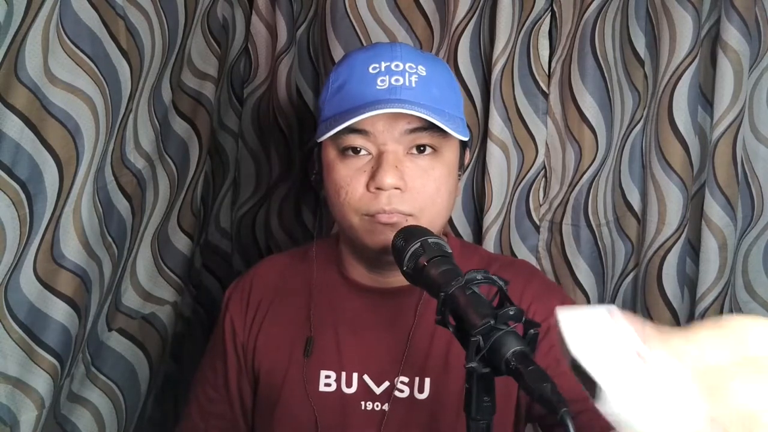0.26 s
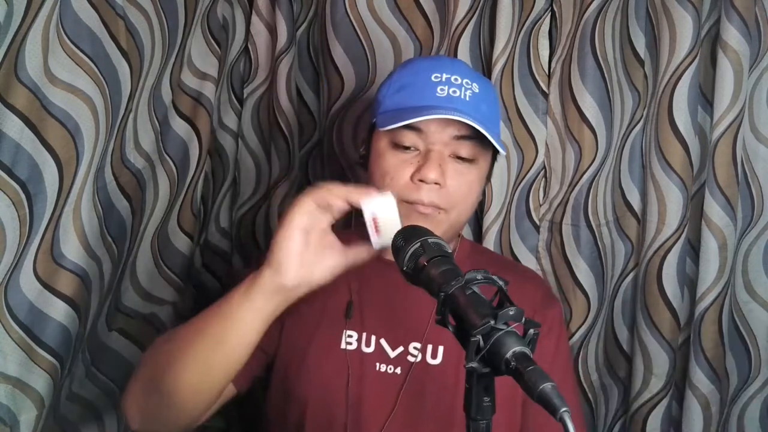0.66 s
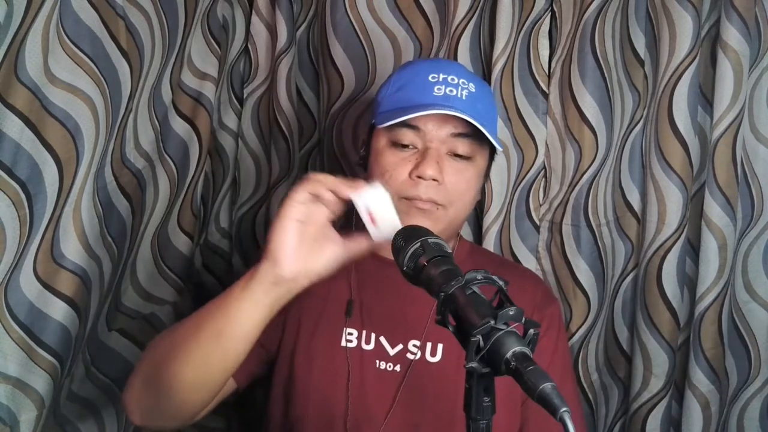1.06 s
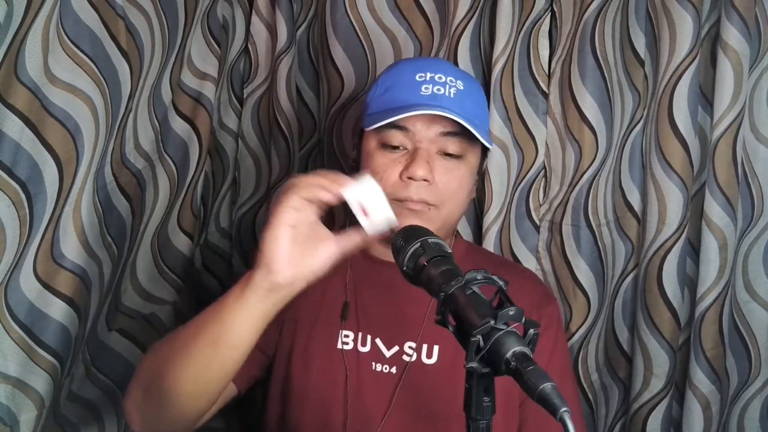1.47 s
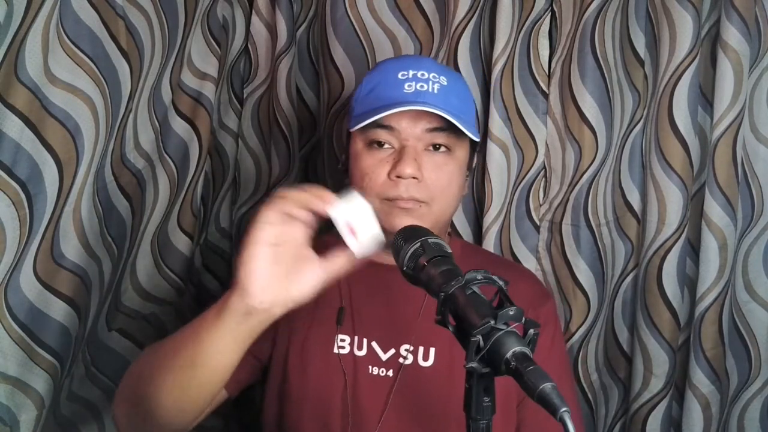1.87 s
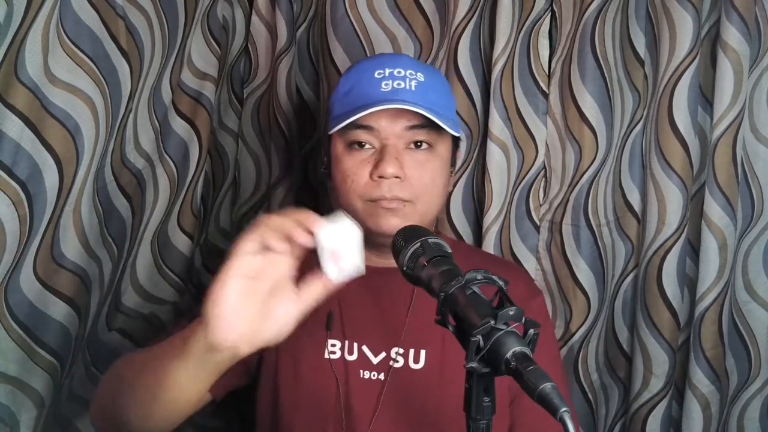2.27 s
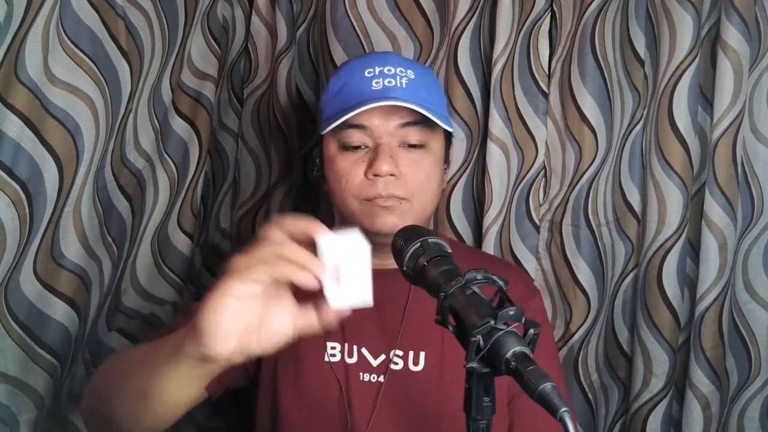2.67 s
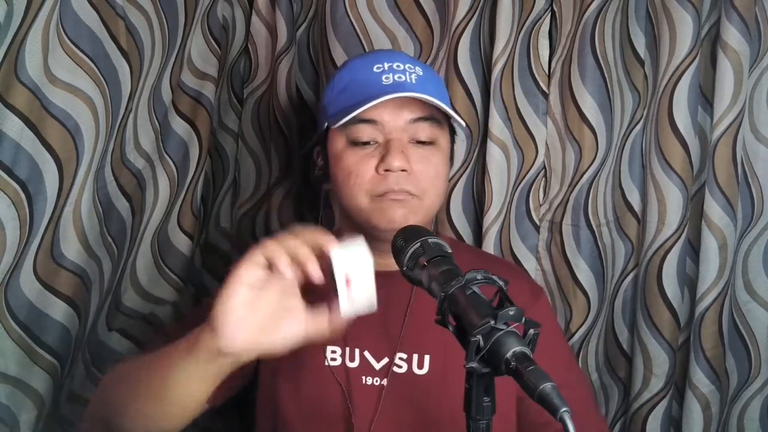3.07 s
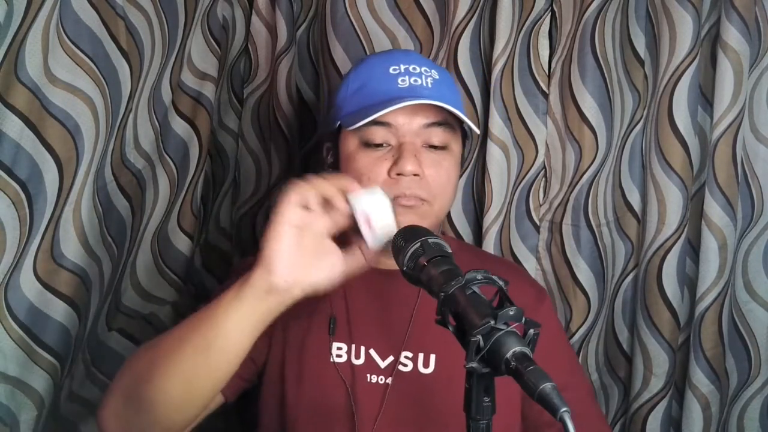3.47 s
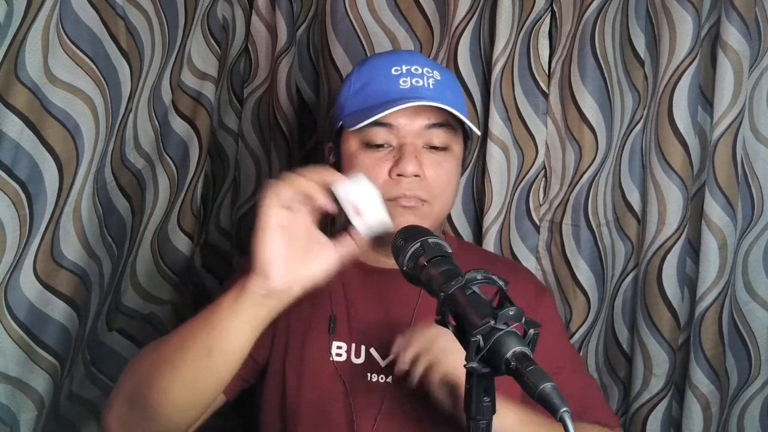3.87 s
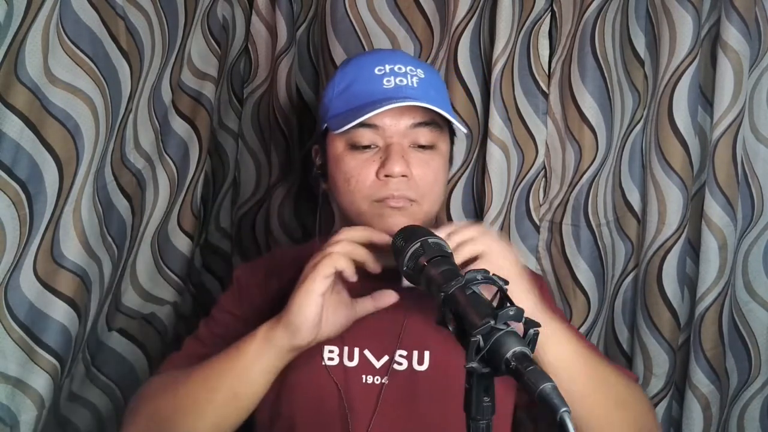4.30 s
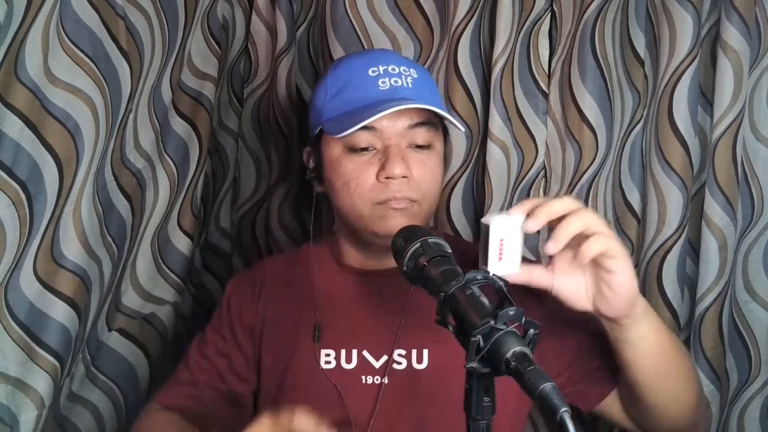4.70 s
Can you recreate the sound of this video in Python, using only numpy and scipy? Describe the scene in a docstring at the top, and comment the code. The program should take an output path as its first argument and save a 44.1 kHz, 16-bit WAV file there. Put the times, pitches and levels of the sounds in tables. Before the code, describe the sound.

Close to a microphone in a small curtained indoor space, wooden matchsticks slide and land inside a thin cardboard box, about five strong clatters a second with lighter ones between. They become fainter and more distant past the middle, come back crisp and close, then give way to sparse soft handling rattles. Quiet hiss runs underneath, with a brief opening rumble and barely audible hum.

```python
"""A low rumble opens the scene and soon stops; a steady thin hiss runs throughout and a faint hum swells now and then.
After a few small clatters of matches in their box, a hand shakes it about five times a second in a curtained room.
On each stroke they slide along the tray and land in a clatter of tiny clicks; the cardboard rings briefly and thuds.
The small room is heard more or less strongly as the box moves, and a few more small clatters end the scene.
The wood and box sounds are random clicks passed through short ringing tones; the rumble and hiss are shaped noise."""
import sys
import numpy as np
from scipy import signal
from scipy.fft import rfft, irfft
from scipy.io import wavfile
from scipy.ndimage import uniform_filter1d

SR = 44100
rng = np.random.default_rng(int(sys.argv[2]) if len(sys.argv) > 2 else 0)


def wav_record(signal):
    """Record a signal, one row per channel, as 16-bit PCM in the file named by sys.argv[1]."""
    frames = np.transpose(np.atleast_2d(signal))
    bounded = np.clip(frames, -1, 1)
    # unit amplitude maps onto the largest positive 16-bit level
    quanta = np.round(bounded * 32767).astype(np.int16)
    wavfile.write(sys.argv[1], SR, quanta)


N = 213530
TIME = np.arange(N) / SR
ONE_MS = np.sqrt(SR / 1000)  # gives a sound of energy one the energy of 1 ms at full level
TYPICAL_DB = -26.5  # energy of a typical landing, as dB over 1 ms


def undb(db):
    """Decibels to gain."""
    return 10 ** (np.asarray(db) / 20)


def curve(rows, t=TIME, axis=1):
    """One column of a table, joined by straight lines in time."""
    rows = np.array(rows)
    return np.interp(t, rows[:, 0], rows[:, axis])


def unit(x):
    """The same sound with an energy of one."""
    return x / np.sqrt(np.sum(x ** 2) + 1e-20)


def chance(size=None):
    """Bell-shaped random numbers without extremes."""
    return np.clip(rng.standard_normal(size), -2, 2)


def response(points, size=2048):
    """Short click of unit energy with the given (frequency [Hz], level [dB]) spectrum, strongest early on."""
    hz, db = np.transpose(points)
    bins = np.maximum(np.fft.rfftfreq(size, 1 / SR), 1)
    log_gain = np.log(undb(np.interp(np.log(bins), np.log(hz), db)))
    # folding the cepstrum makes the click start at once, with nothing before it
    cepstrum = irfft(log_gain)
    cepstrum[1:size // 2] *= 2
    cepstrum[size // 2 + 1:] = 0
    return unit(irfft(np.exp(rfft(cepstrum))))


def through(x, impulse):
    """Pass a sound through an impulse response."""
    return signal.fftconvolve(x, impulse)[:len(x)]


def noise(points):
    """Coloured noise with an rms near one."""
    return through(rng.standard_normal(N), response(points, size=8192))


def add(track, s, sound):
    """Mix a sound into a track at a time in seconds."""
    start = int(np.clip(s * SR, 0, N - 1))
    track[start:start + len(sound)] += sound[:N - start]


# colour of the hiss and room tone: (frequency [Hz], level [dB])
HISS_COLOUR = [(20, 2), (50, 10.5), (110, 15), (200, 11.5), (350, 6), (600, 5), (1500, 1.5), (4000, 0.5),
               (15500, -1.5)]


def hiss(level_db=-65):
    """Steady hiss and room tone: shaped noise."""
    return noise(HISS_COLOUR) * undb(level_db)


# colour of the rumble: (frequency [Hz], level [dB])
RUMBLE_COLOUR = [(12, -28), (20, -5), (45, -3.5), (95, 2), (150, -4.5), (215, -14), (350, -22),
                 (600, -30.5), (900, -40), (2000, -55)]


def rumble(level_db=-39.5, hold_s=0.042, fade_db_per_s=80, end_s=0.382, release_s=0.03, flutter_db=3, size=900):
    """Low noise, made lumpy by a slow random level, that holds, fades and stops."""
    smooth = uniform_filter1d(uniform_filter1d(rng.standard_normal(N), size), size)
    lumps = unit(smooth) * np.sqrt(N)
    fade_db = fade_db_per_s * np.maximum(TIME - hold_s, 0)
    level = undb(level_db - fade_db + flutter_db * np.tanh(lumps))
    return noise(RUMBLE_COLOUR) * level * np.clip((end_s - TIME) / release_s, 0, 1)


# faint swells of hum: (middle [s], length [s], frequency [Hz], level [dB])
HUMS = [(1.2, 1.0, 112.3, -73.5), (2.408, 0.76, 172.3, -70.5), (2.994, 0.64, 126.1, -75.5)]


def hum(waver=0.0027):
    """Pure low tones that swell and fade, their pitch wavering slightly."""
    drift = unit(uniform_filter1d(rng.standard_normal(N), size=3000)) * np.sqrt(N)
    phase = 2 * np.pi * np.cumsum(1 + waver * drift) / SR
    out = np.zeros(N)
    for s, length, hz, db in HUMS:
        swell = np.cos(np.pi * np.clip((TIME - s) / length, -.5, .5))
        out += np.sqrt(2) * np.sin(hz * phase) * undb(db) * swell
    return out


# room sound relative to direct sound, high when the box is held far off: (time [s], level [dB])
DISTANCE = [(0.1, 1.5), (0.55, -18.5), (2.0, -19), (2.4, -8), (3.05, -10), (3.3, -20), (4.0, -27),
            (4.5, -8)]
# colour of the room: (frequency [Hz], level [dB])
ROOM_COLOUR = [(100, 3.5), (600, -4), (2000, -13.5), (4500, -7), (8000, -7.5), (15000, -27)]


def room(x, t60_s=0.069, first_s=0.00248, size=16384):
    """Dense reflections after a tiny gap: a short tail of fading noise, damped by curtains."""
    t = np.arange(size) / SR
    decay = undb(-60 * t / t60_s)  # t60 is the time to fall by 60 dB
    tail = through(rng.standard_normal(size) * decay * (t > first_s), response(ROOM_COLOUR))
    return through(x * undb(curve(DISTANCE)), unit(tail))


# how freely the matches slide, as a change in the level of sliding: (time [s], level [dB])
LOOSENESS = [(0.5, -1), (0.62, 3.5), (1.5, 2), (1.9, 0), (2.9, -6), (3.43, 8.5), (3.85, 5.5), (4.05, -4.5),
             (4.5, 5)]
# each kind of movement: (sliding at a typical landing [dB], thud offset [dB], pitch of the box [Hz])
FORWARD_FEEL, BACK_FEEL, SMALL_FEEL = (-52.5, 0, 1718), (-50, -7, 1847), (-64, -1.5, 1910)


def strokes(slope=0.2):
    """Every movement: (middle of landing [s], sliding [dB], thud offset [dB], pitch of the box [Hz])."""
    rows = []
    for table, feel in ((FORWARD, FORWARD_FEEL), (BACK, BACK_FEEL), (SMALL_CLATTERS, SMALL_FEEL)):
        slide_db, thud_db, hz = feel
        for s, ms, db, *_ in table:
            # harder landings slide louder
            rows.append((s + ms / 2000, slide_db + slope * (db - TYPICAL_DB), thud_db, hz))
    rows = np.array(sorted(rows))
    rows[:, 1] += curve(LOOSENESS, rows[:, 0])
    return rows


def ring(modes, pitch=1, detune=.05, scatter_db=4, size=2048):
    """Fading tones (modes) that answer one tap; they shift with where the matches lie."""
    t = np.arange(size) / SR
    hz, t60, db = np.transpose(modes)[:, :, None]
    shift, strength = chance((2, len(hz), 1))
    level = undb(db + scatter_db * strength - 60 * t / t60)
    tones = np.sin(2 * np.pi * pitch * hz * (1 + detune * shift) * t) * level
    # such small things radiate little below their lowest mode
    low_cut = signal.butter(3, .7 * pitch * hz.min(), "high", fs=SR, output="sos")
    return unit(signal.sosfilt(low_cut, tones.sum(axis=0)))


# modes of the cardboard box: (multiple of its pitch, time to fall 60 dB [s], level [dB])
BOX_MODES = [(.87, 0.0096, -24), (0.97, 0.022, 7), (1.07, 0.01, 1.5), (1.68, 0.0021, -3)]


def box_ring(s):
    """The cardboard's ring; its pitch depends on which end of the tray is struck."""
    return ring(BOX_MODES, curve(strokes(), s, axis=3), detune=0.048, scatter_db=12)


# spectrum of a dry wooden contact: (frequency [Hz], level [dB])
WOOD = [(100, -61), (400, -23), (700, -9.5), (1050, -15.5), (1500, 6), (2300, 4.5), (2900, 4), (3900, 3.5),
        (5200, -11.5), (6500, -0.5), (10000, -14.5), (16000, -34)]
# modes of the matchsticks: (frequency [Hz], time to fall 60 dB [s], level [dB])
STICK_MODES = [(2410, 0.013, -4.5), (2755, 0.012, 5), (3170, 0.006, -8.5), (3580, 0.025, -6),
               (4200, 0.0083, 5), (4690, 0.0076, 13), (5600, 0.015, -3.5), (8310, 0.0044, 4)]


def stick_knock(modes_db=-2):
    """A dry wooden knock, coloured by the sticks that happen to be hit."""
    return unit(response(WOOD) + undb(modes_db) * ring(STICK_MODES, detune=0.086, scatter_db=3))


# spectrum of stick meeting stick: (frequency [Hz], level [dB])
TICK = [(1000, -12.5), (4000, -26), (5700, 15.5), (7200, 8.5), (8900, 8), (10500, 1), (12000, -2),
        (13500, -18), (16000, -12)]


def bright_tick():
    """The bright tick of stick meeting stick."""
    return response(TICK)


def tap(s, ring_db, tick_db):
    """One contact: a wooden knock with some ring of the box and some bright tick."""
    return unit(stick_knock() + undb(ring_db) * box_ring(s) + undb(tick_db) * bright_tick())


# spectrum of the thud: (frequency [Hz], level [dB])
THUD = [(20, -43), (45, -2.5), (85, 6), (125, 7.5), (210, 1), (330, -5.5), (600, -10), (1500, -34)]
# level of the thud relative to the clacks: (time [s], level [dB])
THUD_LEVEL = [(0.65, -17), (0.85, -30.5), (1.4, -18), (2.2, -17.5), (3.3, -17), (3.8, -10), (4.05, -16.5)]


def thuds(bunches, lag_s=0.0016, gain_db=-0.5):
    """The weight of the matches pushes the whole box wall, making a low thump."""
    pushes, moves = np.zeros(N), strokes()
    for s, ms, db, _, _ in bunches:
        middle = s + ms / 2000
        push_db = db + curve(THUD_LEVEL, s) + curve(moves, s, axis=2) + gain_db
        add(pushes, middle + lag_s, ONE_MS * undb(push_db) * rng.choice([-1, 1], 1))
    return through(pushes, response(THUD, size=8192))


def loose_sticks(start_s=0.44, end_s=4.05, level_db=-58, scatter_db=1.0, ring_db=2, tick_db=-8, count=100):
    """During the shaking, single sticks tap the tray at random, the louder the more freely they move."""
    out = np.zeros(N)
    for s in rng.uniform(start_s, end_s, count):
        tap_db = level_db + curve(LOOSENESS, s) + scatter_db * chance()
        add(out, s, tap(s, ring_db, tick_db) * ONE_MS * undb(tap_db))
    return out


def stray_matches(spread_s=.016, lag_s=0.0062, level_db=5, fade_db=7, scatter_db=3, ring_db=-1, tick_db=-3, count=6):
    """Single matches tumble ahead of the rest or bounce after them, weaker the further from the crowd."""
    out = np.zeros(N)
    for s, slide_db, _, _ in strokes():
        for when, force, hollow, bright in chance((count, 4)):
            sound = tap(s, ring_db + scatter_db * hollow, tick_db + scatter_db * bright)
            tap_db = slide_db + level_db + scatter_db * force - fade_db * abs(when)
            add(out, s + lag_s + spread_s * when, sound * ONE_MS * undb(tap_db))
    return out


def sliding(rise_s=0.0093, fall_s=0.0074, grains_per_s=1900, scatter_db=6.0, ring_db=-2, tick_db=-3,
            gain_db=1, scrape_db=-13, scrape_s=0.016, size=8192):
    """Fine grains of friction swell as the matches start to slide and die away as they settle."""
    out = np.zeros(N)
    t = (np.arange(size) - size // 2) / SR
    motion = np.exp(np.minimum(t / rise_s, -t / fall_s))
    for s, db, _, _ in strokes():
        grains = (rng.random(size) < grains_per_s / SR) * undb(scatter_db * chance(size))
        grains = unit(grains * rng.choice([-1, 1], size)) * np.sqrt(size)
        slide = through(grains * motion, tap(s, ring_db, tick_db))
        # slow, soft rubbing on the tray lasts longer and sounds only the box
        scrape = through(grains * np.exp(-np.abs(t) / scrape_s), box_ring(s)) * undb(scrape_db)
        add(out, s + t[0], (slide + scrape) * undb(db + gain_db))
    return out


def bounces(s, db, count=3, gap_s=0.0055, jitter_s=0.00064, loss_db=8):
    """Loose sticks hop on the tray, each hop weaker, shorter and hollower; the lightest hops lose the least."""
    typical_ms, typical_ring_db, typical_tick_db = 1.8, 3, 1  # for a bounce as strong as a typical landing
    doubling_db = 9.5  # a bounce this much stronger involves more sticks and lasts twice as long
    hollow_slope = 0.6  # softer bounces sound more of the box [dB per dB]
    rows = []
    for jitter in chance(count):
        force_db = db - TYPICAL_DB
        bulk = 2 ** (force_db / doubling_db)
        rows.append((s, typical_ms * bulk, db, typical_ring_db - hollow_slope * force_db, typical_tick_db))
        s += gap_s + jitter_s * jitter
        db -= loss_db * np.sqrt(bulk)
    return rows


# forward strokes throw the matches hard at the end of the tray; the pile falls back, then loose sticks bounce:
# (time [s], length of landing [ms], energy over 1 ms [dB], ring of the box [dB],
#  fall-back after [ms], its energy [dB], first bounce after [ms], its energy [dB])
FORWARD = [(0.6668, 5.4, -31, 9, 5.6, -52, 13, -49), (0.826, 4.5, -24, -2, 8.5, -36, 24.6, -34.5),
           (1.0187, 4.55, -25, 3, 12, -56, 27.3, -35), (1.2083, 4.8, -22, 6.5, 13, -36.5, 34.4, -38.5),
           (1.3935, 2.87, -23, 6, 17, -36, 37, -37.5), (1.5961, 3.7, -23.5, -25, 22.6, -34, 18.5, -36.5),
           (1.8114, 4.8, -21, 8.5, 12.4, -31, 25.6, -36), (2.0114, 3.7, -23, 10.5, 9.9, -36, 19.6, -39.5),
           (2.2191, 5.9, -26.5, 15, 11, -35.5, 16, -52), (2.4233, 3.07, -34, 8, 6.5, -50, 19, -53),
           (2.623, 5.3, -38, -13, 9.6, -48, 15, -55), (2.8276, 9.8, -39.5, 6.5, 5.8, -47, 17, -71),
           (3.03, 5.1, -40.5, 6, 6, -38, 16, -37), (3.2512, 3.64, -25.5, 7, 9.3, -32, 21.5, -39.5),
           (3.431, 6.5, -22, 6, 21.2, -29, 31.3, -30), (3.6174, 4.5, -23.5, 0, 14, -23, 22, -33.5),
           (3.8041, 4.25, -21.5, -31, 10.8, -22.5, 19.6, -25),
           (3.9995, 7.2, -24.5, 3.5, 6.9, -31, 17.7, -32.5)]
# back strokes are gentler, and the matches arrive in two bunches:
# (time [s], length of landing [ms], energy over 1 ms [dB], ring of the box [dB],
#  lag of the smaller bunch, ahead if negative [ms], its energy [dB])
BACK = [(0.4777, 3.8, -36, 3, 9, -36.5), (0.6297, 7.3, -34, 7, -6, -40), (0.761, 4, -30.5, -23, 9.5, -30),
        (0.948, 6.5, -30.5, 3, -6, -33), (1.141, 8.6, -34, -14, -29.5, -43),
        (1.3217, 6.7, -29, 10.5, -14.5, -35.5), (1.5198, 4.4, -26.5, 14.5, -18.5, -35),
        (1.7336, 3.3, -25, 11, -5, -44), (1.9365, 7.1, -27.5, 5, 7.5, -35),
        (2.146, 10.5, -32.5, 9.5, -17.5, -41.5), (2.3546, 2.4, -34, 10, 13, -60),
        (2.5575, 4.9, -47.5, 5, -18.5, -44.5), (2.755, 2.3, -35.5, 16, 2.5, -48),
        (2.9615, 3.7, -40.5, -17, 10.5, -44.5), (3.167, 2.7, -30.5, 22, -4.5, -34.5),
        (3.3771, 5.8, -27.5, 13, -7, -27.5), (3.5433, 4.4, -28.5, 10.5, -6.5, -37),
        (3.7263, 6, -27, 7, -2, -46), (3.9102, 5.6, -29, 7.5, 8, -37)]
# smaller clatters of matches, before, between and after the strokes:
# (time [s], length [ms], energy over 1 ms [dB], ring of the box [dB])
SMALL_CLATTERS = [(0.1027, 2.5, -46.5, -4), (0.2085, 1.86, -46.5, -47), (0.3283, 5, -45, -32),
                  (0.613, 2.4, -46, 3), (0.646, 1.5, -33.5, -2), (0.7773, 4.1, -42, 11),
                  (3.1129, 3.4, -45, 10), (3.2386, 7, -32, 4), (4.146, 20, -44, 0), (4.275, 21.5, -51.5, 2),
                  (4.424, 5.2, -45.5, 8), (4.448, 29, -46, 9), (4.519, 19, -43, 9), (4.5328, 2.9, -42.5, 5),
                  (4.5584, 1.55, -44.5, -25), (4.643, 4.3, -37.5, 9), (4.6932, 3.8, -35, -9.5),
                  (4.716, 1.6, -45, -19.5), (4.7993, 8.3, -39.5, -8)]


def landings(fall_back_ms=7.1, small_bunch_ms=3.06, second_ring_db=6, tick_offset_db=-1.5, tick_slope=0.31):
    """Every bunch that hits the box: (time [s], length [ms], energy [dB], ring of the box [dB], tick [dB])."""
    clatter_tick_db, bunch_tick_db = -2.5, -3  # small clatters and smaller bunches tick less
    rows = [(s, ms, db, ring_db, 0) for s, ms, db, ring_db, *_ in FORWARD + BACK]
    rows += [(s, ms, db, ring_db, clatter_tick_db) for s, ms, db, ring_db in SMALL_CLATTERS]
    for s, _, _, _, fall_ms, fall_db, bounce_ms, bounce_db in FORWARD:
        rows.append((s + fall_ms / 1000, fall_back_ms, fall_db, second_ring_db, bunch_tick_db))
        rows += bounces(s + bounce_ms / 1000, bounce_db)
    for s, *_, lag_ms, db in BACK:
        rows.append((s + lag_ms / 1000, small_bunch_ms, db, second_ring_db, bunch_tick_db))
    # harder landings tick brighter
    return [(s, ms, db, ring_db, tick_db + tick_offset_db + tick_slope * (db - TYPICAL_DB))
            for s, ms, db, ring_db, tick_db in rows]


def cluster(ms, clicks_per_ms=6, scatter_db=4, fringe_db=-13, lead=0.69, trail=1.0, size=2048):
    """Sticks landing in a tight bunch that begins mid-buffer, with a few weaker ones ahead and behind."""
    t_ms = (np.arange(size) - size // 2) * 1000 / SR
    place = t_ms / max(ms, .3)  # 0 at the start of the bunch, 1 at its end
    bunch = np.maximum(4 * place * (1 - place), 0) ** .2
    outside = np.minimum(np.minimum(place / lead, (1 - place) / trail), 0)
    fringe = undb(fringe_db) * np.exp(outside)
    lands = rng.random(size) < clicks_per_ms * 1000 / SR
    force = undb(scatter_db * chance(size)) * rng.choice([-1, 1], size)
    return lands * force * np.maximum(bunch, fringe)


def clacks(bunches, ring_gain_db=-10.5, tick_gain_db=-0.9):
    """Each cluster knocks the wood, rings the box and, where stick meets stick, ticks brightly."""
    out = np.zeros(N)
    for s, ms, db, ring_db, tick_db in bunches:
        hits = cluster(ms)
        sound = unit(through(hits, stick_knock()))
        sound = sound + undb(ring_db + ring_gain_db) * unit(through(hits, box_ring(s)))
        sound = sound + undb(tick_db + tick_gain_db) * unit(through(hits, bright_tick()))
        add(out, s - len(hits) / 2 / SR, unit(sound) * ONE_MS * undb(db))
    return out


def scene():
    """The rattling box in its room, over the hiss, rumble and hum."""
    background = hiss() + rumble() + hum()
    bunches = landings()
    box = thuds(bunches) + loose_sticks() + stray_matches() + sliding() + clacks(bunches)
    return (background + room(box) + box)[None]


def record(dry, top_hz=15900):
    """The recorder cuts the top of the treble with a steep filter."""
    return signal.sosfilt(signal.ellip(10, .2, 70, top_hz, fs=SR, output="sos"), dry)


dry = scene()
out = record(dry)
wav_record(out)
```